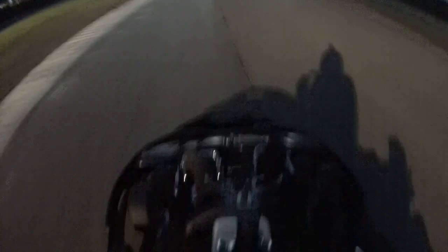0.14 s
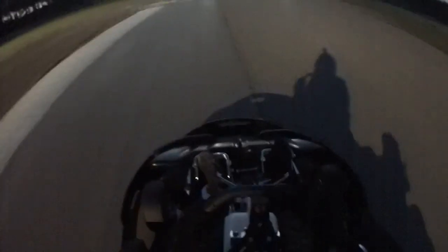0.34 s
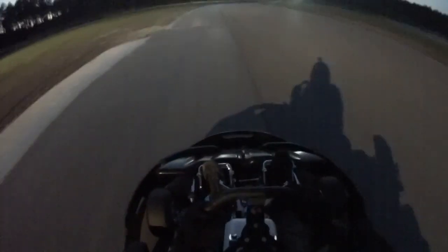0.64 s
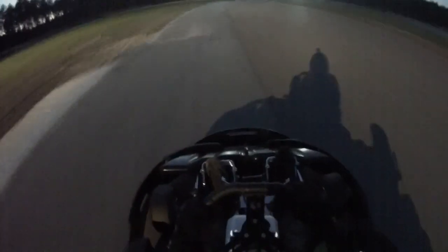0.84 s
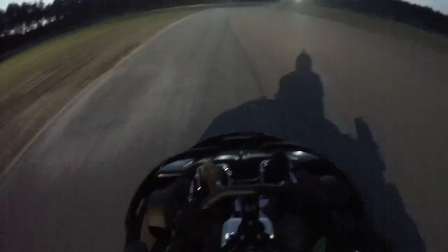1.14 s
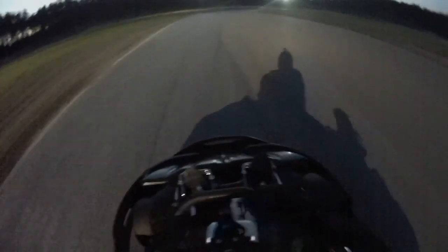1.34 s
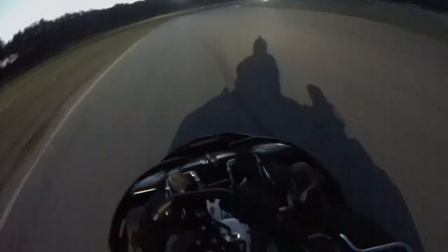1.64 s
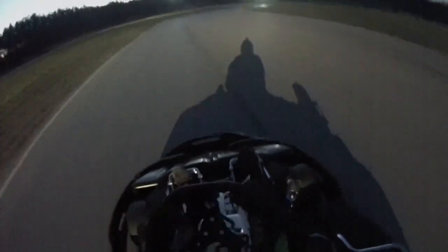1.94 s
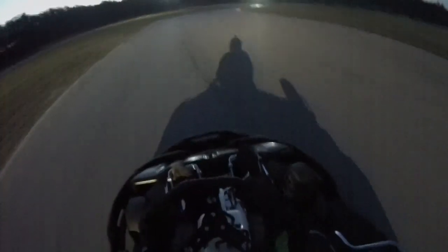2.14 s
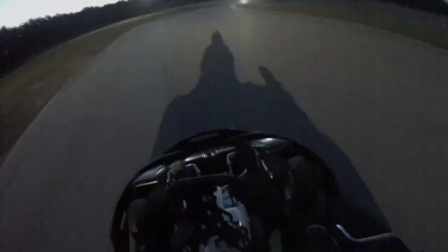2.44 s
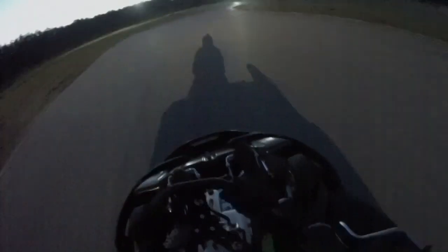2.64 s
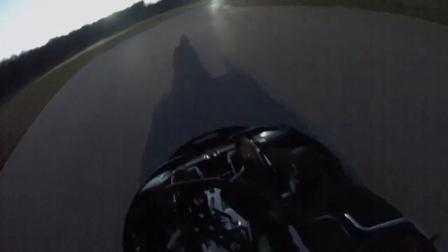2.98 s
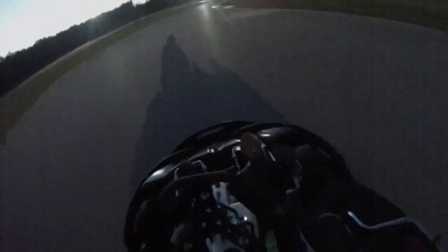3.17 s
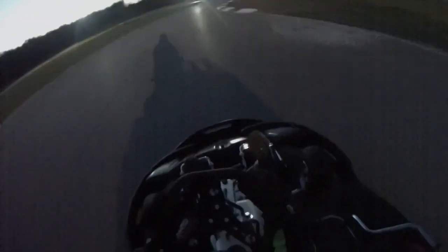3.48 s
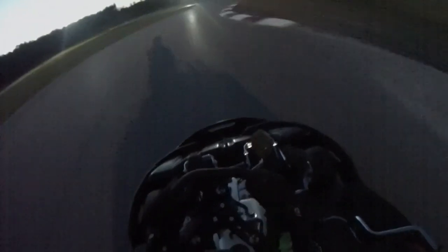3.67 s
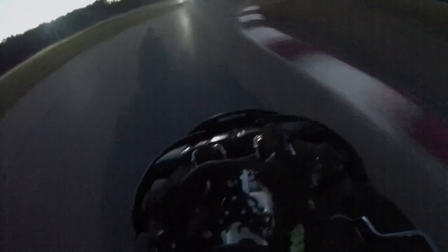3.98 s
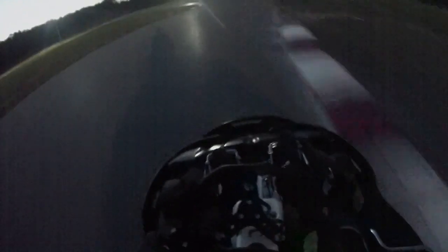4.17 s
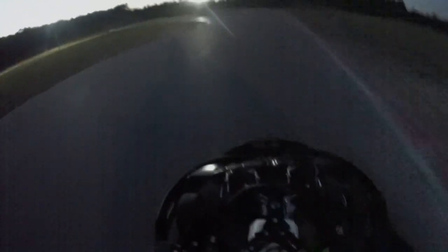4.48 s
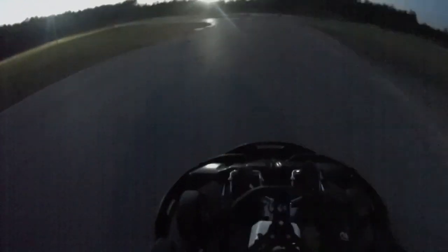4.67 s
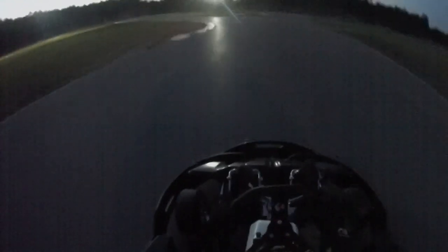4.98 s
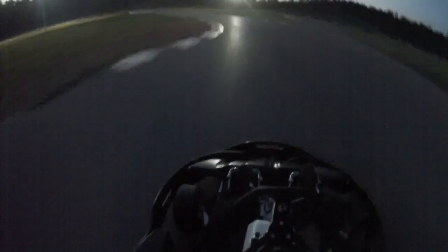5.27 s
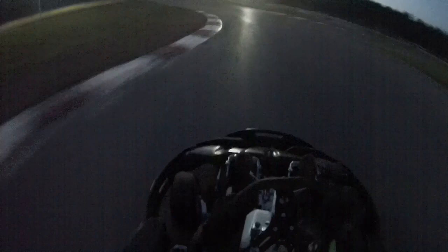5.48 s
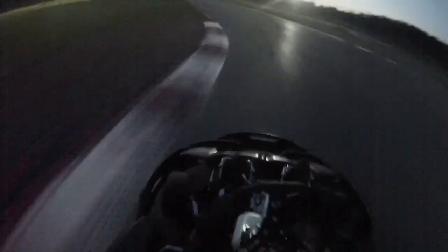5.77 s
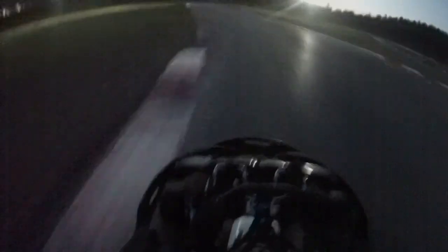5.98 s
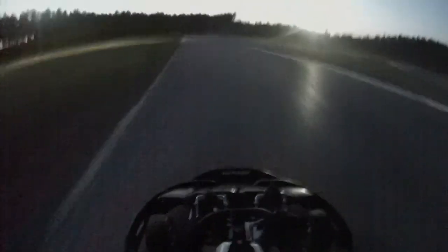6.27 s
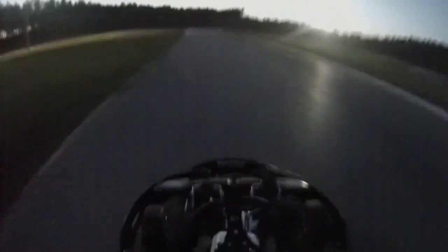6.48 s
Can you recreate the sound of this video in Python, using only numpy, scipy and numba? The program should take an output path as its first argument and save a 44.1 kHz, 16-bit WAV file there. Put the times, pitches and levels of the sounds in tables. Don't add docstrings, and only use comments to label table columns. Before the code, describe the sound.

Onboard a racing kart: rapid engine popping climbs in pitch, gears and chain whine faintly, tyres rumble, and hissing wind grows to a roar.

```python
import sys
import numpy as np
from scipy import signal
from scipy.io import wavfile
from scipy.ndimage import uniform_filter1d
from numba import njit

SR = 44100
rng = np.random.default_rng(int(sys.argv[2]) if len(sys.argv) > 2 else 0)


def voltage_ratio(decibels):
    exponent = np.asarray(decibels, float) / 20
    return 10 ** exponent


def materialize(psi):
    bounded = np.clip(np.atleast_2d(psi).T, -1, 1)
    quanta = np.round(bounded * 32767).astype(np.int16)
    wavfile.write(sys.argv[1], SR, quanta)


N = 291942

MID_SPEED_HZ = 32
# (frequency [Hz], width [Hz], level [dB])
CASE_LOW = [(1582.4, 217, 1), (1919, 195, -3.5), (2320, 358, -5), (2726, 374, -13), (3303, 445, -13.5)]
CASE_HIGH = [(4240, 590, -2), (4903, 400, 4.5), (5630, 730, -1.5), (6435, 1080, -1.5), (7480, 1070, -9),
             (9270, 3150, -11.5), (12110, 700, -14), (13800, 6300, -22)]


def unit(x):
    return x / np.sqrt(np.mean(x ** 2))


@njit
def svf(x, hz, width):
    y, b, l = np.empty(len(x)), 0., 0.
    g, k = np.tan(np.pi * hz / SR), width / hz
    for i in range(len(x)):
        v = (b + g * (x[i] - l)) / (1 + g * (g + k))
        b, l, y[i] = 2 * v - b, l + 2 * g * v, k * v
    return y


def steep(x, hz, width_hz):
    once = svf(x, 1. * hz, 1.4 * width_hz)
    return svf(once, 1. * hz, 1.4 * width_hz)


def walk(rate):
    hold = int(SR / rate)
    levels = np.repeat(rng.standard_normal(N // hold + 1), hold)
    smooth = uniform_filter1d(uniform_filter1d(levels, hold), hold)
    return 0.79 * smooth[:N]


def moment(t, centre_s, length_s):
    return np.exp(-((t - centre_s) / length_s) ** 2)


def strokes(cycle, lag, scatter_db):
    turn = cycle - lag
    at = np.flatnonzero(np.diff(np.floor(turn)) > 0)
    late = (np.ceil(turn[at]) - turn[at]) / (turn[at + 1] - turn[at])
    size = voltage_ratio(scatter_db * rng.standard_normal(len(at)))
    clicks = np.zeros(N)
    clicks[at] = size * (1 - late)
    clicks[at + 1] = size * late
    return clicks


def turbulence(modes, shared_db, own_db, rate):
    eddies = shared_db * walk(rate)
    total = np.zeros(N)
    for f, w, db in modes:
        flicker = own_db * walk(rate / 2)
        total += voltage_ratio(db + eddies + flicker) * steep(rng.standard_normal(N), f, w)
    return unit(total)


def blow_down(cycle):
    # (frequency [Hz], width [Hz], level [dB])
    pipe = [(570, 130, 0), (680, 120, -1), (900, 300, -9), (1700, 700, -12)]
    echo = int(.0052 * SR)
    blow = strokes(cycle, 0, scatter_db=1.6)
    blow = blow + 0.12 * strokes(cycle, .5, scatter_db=2.5)
    clicks = blow + .5 * np.roll(blow, echo) + .25 * np.roll(blow, 2 * echo)
    return unit(sum(voltage_ratio(db) * steep(clicks, f, w) for f, w, db in pipe))


def pipe_note(t, hz, cycle):
    # (frequency [Hz], level of a partial [dB])
    response = [(100, -43), (200, -40), (240, -44), (282, -40.5), (308, -52), (332, -41), (402, -38),
                (426, -55)]
    response_hz, response_db = np.transpose(response)
    lift_s, lift_db = 4.65, -8
    dulled = lift_db * np.clip((t - lift_s) / 0.4 + .5, 0, 1)
    opening = 14 * np.log2(hz / MID_SPEED_HZ).clip(None, 0)
    heat = (hz / MID_SPEED_HZ) ** .2
    note = np.zeros(N)
    for k in range(4, 17):
        partial_hz = k * hz
        db = np.interp(np.log(partial_hz / heat), np.log(response_hz), response_db)
        db = db - 2.5 * (k % 2) + 1.3 * walk(6)
        db = db + dulled * np.clip((partial_hz - 330) / 30, 0, 1)
        db = db + opening * np.clip((partial_hz - 345) / 25, 0, 1)
        phase = 2 * np.pi * k * cycle - 6 / k + .2 * walk(6)
        note += np.sqrt(2) * voltage_ratio(db) * (partial_hz < 500) * np.cos(phase)
    return note


def seat_shake(cycle):
    # (multiple of the firing rate, level [dB])
    shake = [(1, -41), (2, -39), (3, -44)]
    total = np.zeros(N)
    for k, db in shake:
        total -= voltage_ratio(db + 3 + .8 * walk(3)) * np.cos(2 * np.pi * k * (cycle - .35))
    return total


def gas(cycle):
    turn = (cycle + .05) % 1
    firing = (cycle + .05).astype(int).clip(0)
    strength = voltage_ratio(1.3 * rng.standard_normal(400))[firing]

    def puff(rise, fall):
        return strength * (1 - np.exp(-(turn / rise) ** 2)) * np.exp(-turn / fall)

    def coloured(shape, modes, tilt_db):
        total = np.zeros(N)
        for f, w, db in modes:
            tilted_db = db + tilt_db * np.log2(f / modes[0][0])
            total += voltage_ratio(tilted_db) * steep(shape * rng.standard_normal(N), f, w)
        return unit(total)

    sharp, slow = puff(.03, .27), puff(.1, .33)
    return coloured(sharp, CASE_LOW, 4) + voltage_ratio(-10) * coloured(slow, CASE_HIGH, -3)


def chain_tension(t):
    # (time [s], length [s], tooth whine [dB])
    taut_moments = [
        (.25, 0.22, -48),
        (.75, 0.21, -36),
        (5.4, 0.56, -45),
        (6.33, 0.38, -36.5),
    ]
    ring_db, damped_db, slack_whine_db, taut_ring_db = -34, -45, -57, -8
    taut = sum(voltage_ratio(db) * moment(t, s, length) for s, length, db in taut_moments)
    damped = .5 + .5 * np.tanh((t - 2.75) / .2)
    ring = voltage_ratio(ring_db + (damped_db - ring_db) * damped) + voltage_ratio(taut_ring_db) * damped * taut
    whine = voltage_ratio(slack_whine_db) + taut
    return 20 * np.log10(ring), 20 * np.log10(whine)


def frame(cycle, ring_db, whine_db):
    # (multiple of the firing rate, level [dB])
    teeth = [(20, -9), (22, -14), (28, 0)]
    # (multiple of the firing rate, level [dB])
    links = [(23, -9), (24, -1), (25, -8), (26, -6), (27, -1), (29, -4), (30, -8), (31, -3)]
    mode_hz, width_hz, knock_db, rasp_db = 760, 56, -16, -11
    whine = np.zeros(N)
    for k, db in teeth:
        whine += voltage_ratio(db + 0.35 * walk(2)) * np.sin(2 * np.pi * int(k) * cycle)
    pull = whine * (1 + .2 * np.cos(2 * np.pi * (cycle - .1)))
    for k, db in links:
        pull += voltage_ratio(db + .8 * walk(4)) * np.sign(k - 28) * np.sin(2 * np.pi * int(k) * cycle)
    ringing = steep(pull, mode_hz, width_hz)
    knock = unit(steep(strokes(cycle, 0, scatter_db=1.1), mode_hz, 1.6 * width_hz))
    rasp = unit(steep(rng.standard_normal(N), mode_hz, width_hz))
    driven = ringing + voltage_ratio(knock_db) * knock + voltage_ratio(rasp_db) * rasp
    return voltage_ratio(ring_db) * driven + voltage_ratio(whine_db) * whine


def tyres(t, rumble_db):
    # (time [s], length [s], frequency [Hz], level [dB])
    scrub = [
        (4.65, 0.33, 900, -37),
        (5.7, 0.45, 903, -38),
        (6.21, 0.075, 840, -31),
    ]
    # (frequency [Hz], width [Hz], level [dB])
    rolling = [(306, 160, 0), (474, 140, -0.5), (650, 150, -3.5)]
    slips = np.zeros(N)
    for s, length, f, db in scrub:
        groan = unit(steep(rng.standard_normal(N), f, 114))
        slips += voltage_ratio(db + 2.5 * walk(30)) * moment(t, s, length) * groan
    return slips + voltage_ratio(rumble_db) * turbulence(rolling, shared_db=-0.5, own_db=2.0, rate=20)


def air(roar_db, hiss_db, middle_db, buffet_db):
    # (frequency [Hz], width [Hz], level [dB])
    middle_modes = [(813, 280, -1), (910, 600, 0), (1100, 870, -6.5)]
    buffet_modes = [(20, 20, -6), (50, 30, -11), (85, 32, -3), (113, 34, 0), (155, 40, -8), (235, 70, -15)]
    roar = turbulence(CASE_LOW, shared_db=0.85, own_db=-0.26, rate=45)
    hiss = turbulence(CASE_HIGH, shared_db=0.0, own_db=0.95, rate=45)
    middle = turbulence(middle_modes, shared_db=-1.8, own_db=0.3, rate=27)
    buffet = turbulence(buffet_modes, shared_db=0.5, own_db=-3.1, rate=10)
    return voltage_ratio(roar_db) * roar + voltage_ratio(hiss_db) * hiss + voltage_ratio(middle_db) * middle + voltage_ratio(buffet_db + 2) * buffet


def scene():
    # (time [s], firing rate [Hz])
    speed = [(0, 25.48), (.4, 26.33), (1.0, 27.78), (1.8, 29.85), (3.0, 32.7), (3.6, 33.72), (4.4, 35.0),
             (5.0, 36.25), (5.4, 36.91), (5.6, 37.42), (5.8, 37.66), (6.2, 37.39), (6.62, 37.44)]
    # (time [s], roar level [dB])
    wind = [(0, -30), (.3, -27), (.9, -24.5), (1.47, -21), (1.84, -22.5), (2.5, -20), (3.02, -18.5),
            (3.17, -20), (3.8, -19), (4.35, -17.5), (5.0, -17), (5.6, -18.5), (5.8, -20), (6.14, -16),
            (6.3, -14), (6.62, -15)]
    t = np.arange(N) / SR
    hz = np.interp(t, *np.transpose(speed))
    wind_db = np.interp(t, *np.transpose(wind))
    cycle = -.025 + np.cumsum(hz) / SR

    def law(db, per_octave, wind_share):
        return db + per_octave * np.log2(hz / MID_SPEED_HZ) + wind_share * (wind_db + 20)

    exhaust = voltage_ratio(law(-39.8, 0, .1)) * blow_down(cycle)
    exhaust = exhaust + voltage_ratio(law(1.2, 11, 0)) * pipe_note(t, hz, cycle) + seat_shake(cycle)
    puffs = voltage_ratio(law(-28, -3, .2)) * gas(cycle)
    engine = exhaust + puffs + frame(cycle, *chain_tension(t))
    rubber = tyres(t, law(-39.5, 4.3, 0))
    bend_db = 3 * moment(t, 2.5, 1)
    buffet_db = law(-31, 9, 0.19) + bend_db
    airstream = air(wind_db, law(-32, 10, 0.5), law(-35, 3.3, .4), buffet_db)
    return (engine + rubber + airstream)[None]


def roll_off(x):
    return signal.sosfilt(signal.butter(12, 15330, fs=SR, output="sos"), x)


def record(dry):
    mix = np.tanh(0.88 * dry) / 0.91
    return roll_off(mix)


dry = scene()
out = record(dry)
materialize(out)
```